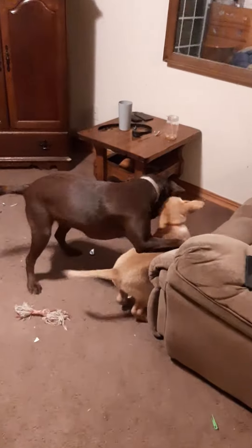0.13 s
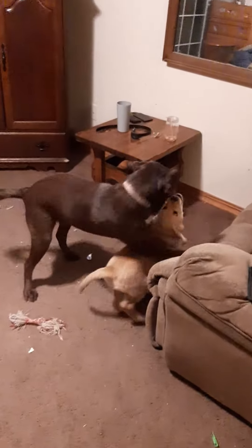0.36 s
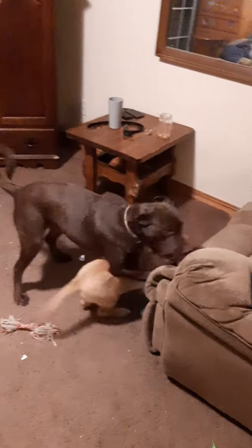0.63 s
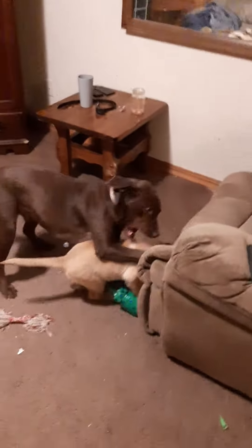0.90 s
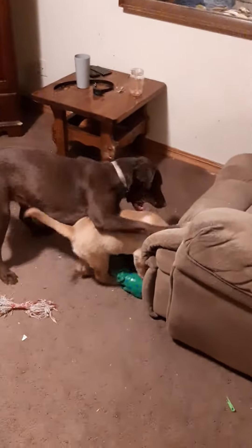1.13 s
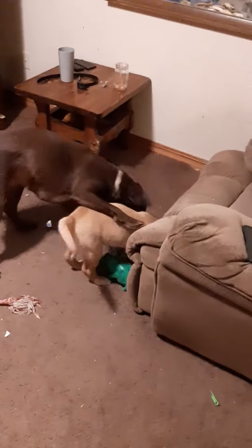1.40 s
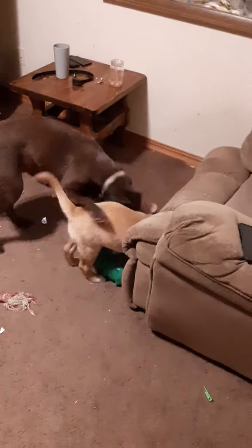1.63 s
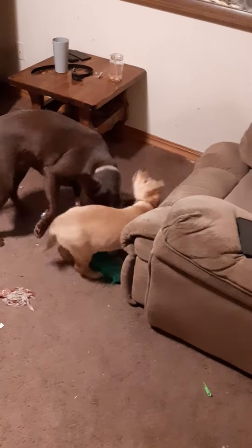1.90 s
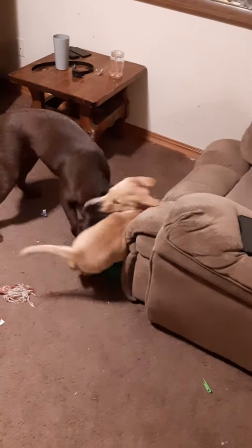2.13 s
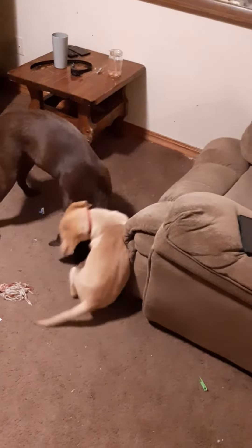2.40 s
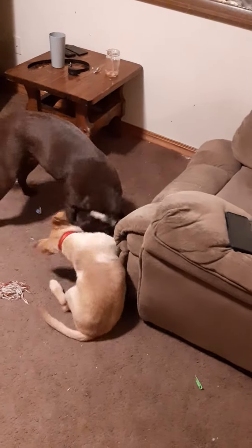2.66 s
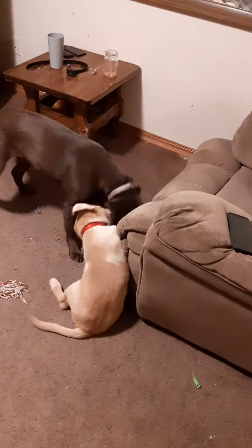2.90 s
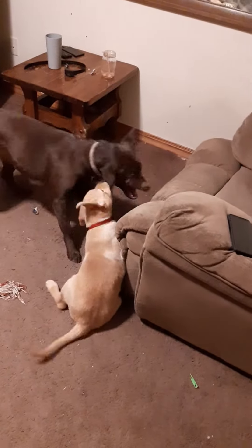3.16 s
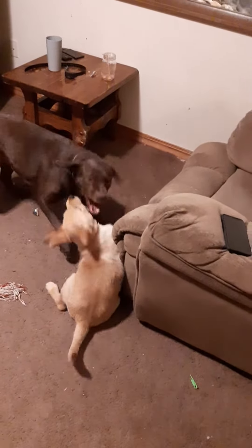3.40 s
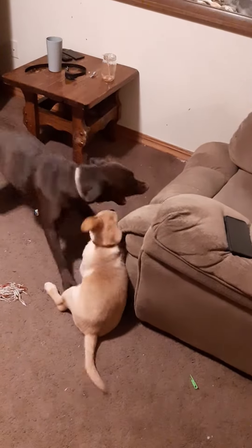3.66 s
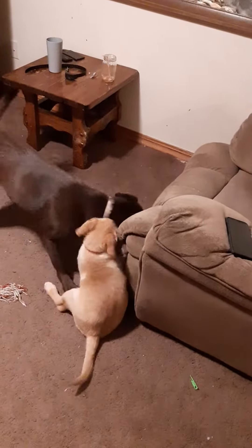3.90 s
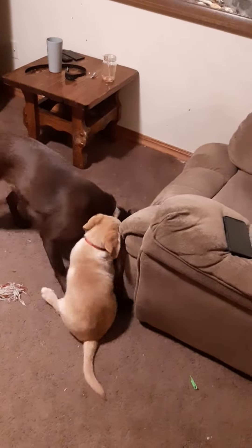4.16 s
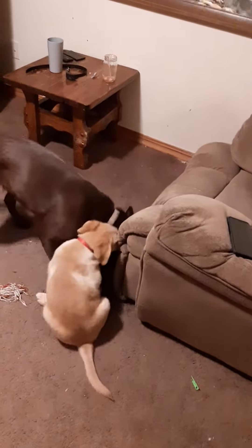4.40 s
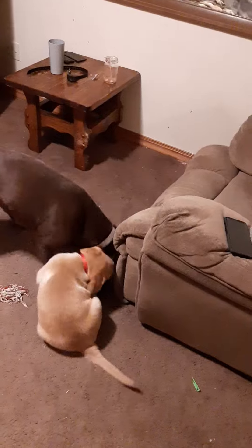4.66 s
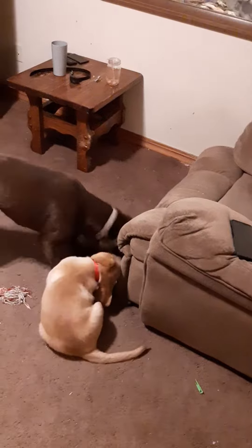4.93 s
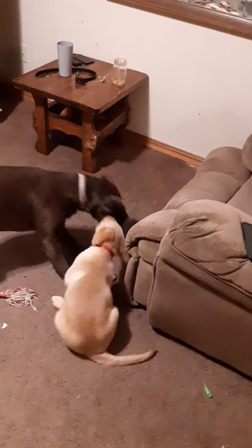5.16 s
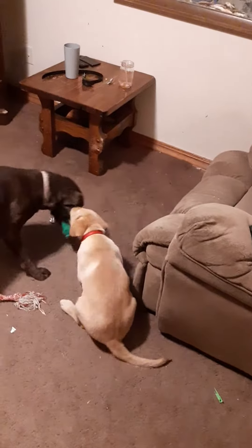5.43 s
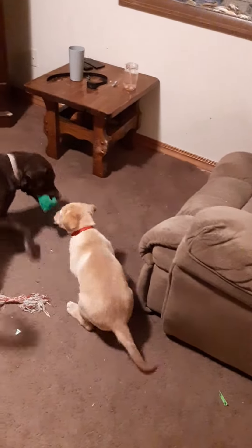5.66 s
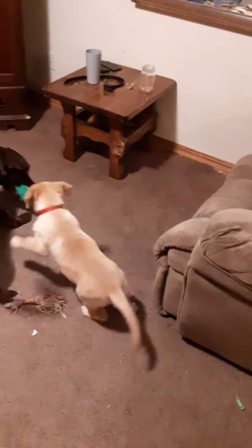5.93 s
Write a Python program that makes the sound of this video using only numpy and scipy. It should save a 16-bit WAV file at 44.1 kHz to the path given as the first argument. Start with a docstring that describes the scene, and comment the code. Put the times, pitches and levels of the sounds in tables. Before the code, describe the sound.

Low, raspy dog growls start at once and repeat in bursts under half a second long, breathy and fluttering, shifting from closed-mouthed to open and snarly. Hissing fur and breath swell around them, with brief metallic tag ticks and dull soft thuds. The growling thins out midway, pauses, returns strongly with snapping, then fades after one last softer growl. Close, dry indoor sound with short echoes, soft air and slight hum.

```python
"""A small furnished room, where two dogs wrestle on the carpet a few steps from a pair of microphones.
They growl in short hoarse bursts: uneven pulses and breath noise ring chest, throat and mouth, and hard snaps
ring the mouth. Shaped noise makes the hiss of fur and breath; ringing modes and a scrape make short bright
rattles, most of them collar tags; sinking sines make low soft thumps, some perhaps paws or bodies on the carpet.
Soft noise and a faint mains hum fill the air; random taps make the echoes."""
import sys
import numpy as np
from scipy import signal
from scipy.fft import rfft, irfft
from scipy.io import wavfile
from scipy.ndimage import uniform_filter1d

SR = 44100
rng = np.random.default_rng(int(sys.argv[2]) if len(sys.argv) > 2 else 0)


def amplitude_ratio(level_db):
    """Convert a level in decibels to the matching linear amplitude (field) ratio."""
    exponent = np.asarray(level_db, float) / 20
    return 10 ** exponent


def wav_out(sig):
    """Save sig, one row per channel (or a flat mono array), as 16-bit PCM at SR to the path in sys.argv[1]."""
    wavfile.write(sys.argv[1], SR, np.round(np.clip(np.atleast_2d(sig).T, -1, 1) * 32767).astype(np.int16))


N = 266805

# how alike diffuse sound is at both microphones: (frequency [Hz], left-right likeness [0-1])
LIKENESS = [(130, .99), (250, .88), (500, .3), (2000, .2), (12000, .2)]


def evened(x):
    """Scales to rms 1."""
    return x / np.sqrt(np.mean(x ** 2) + 1e-20)


def read(points, hz):
    """Reads a spectrum on a log-frequency axis."""
    f, value = np.transpose(points)
    return np.interp(np.log(hz + 1), np.log(f + 1), value)


def add(mix, s, sound):
    """Mixes a sound in at s seconds."""
    part = mix[..., round(s * SR):][..., :sound.shape[-1]]
    part += sound[..., :part.shape[-1]]


def steady(x):
    """Divides out the slow level, so that a curve sets the loudness."""
    return x / np.sqrt(uniform_filter1d(x ** 2, 4000) + 1e-20)


def resonate(x, hz, width):
    """Shifts the curve hz down to zero, smooths twice, and shifts back: a steep moving resonance."""
    turn = np.exp(2j * np.pi * np.cumsum(hz * np.ones(len(x))) / SR)
    r = np.exp(-np.pi * width / SR)
    smooth = signal.lfilter([(1 - r) ** 2], [1, -2 * r, r * r], x / turn)
    return 2 * (turn * smooth).real


def alike(first, second, hz):
    """Blends two independent spectra into a left-right pair as alike as the table says."""
    same = np.clip(read(LIKENESS, hz), -1, 1)[:, None]
    return np.array([first, same * first + np.sqrt(1 - same ** 2) * second])


def noise(field_db):
    """Two partly alike channels of noise shaped by a dB field of (Hz, s), with small random patches."""
    frames, hz = N // 128 + 5, np.fft.rfftfreq(512, 1 / SR)
    a, b, c, d, patches = rng.standard_normal((frames, 257, 5)).T
    patches = evened(uniform_filter1d(uniform_filter1d(patches, 8, 0), 14, 1))
    z = alike(a + 1j * b, c + 1j * d, hz)
    z *= amplitude_ratio(field_db(hz[:, None], np.arange(frames) * 128 / SR) + 2.2 * patches)
    return signal.istft(z, nperseg=512, noverlap=384)[1][:, :N]


def placed(x, lead_ms, left_db):
    """A source off centre reaches the left microphone first; its long bass waves are alike at both."""
    late = np.interp(np.arange(len(x)) - lead_ms * SR / 1000, np.arange(len(x)), x)
    left, right = x * amplitude_ratio(left_db / 2), late * amplitude_ratio(-left_db / 2)
    side = signal.lfilter(*signal.butter(2, 200, "high", fs=SR), left - right)
    return (left + right + np.array([side, -side])) / 2


def growl(rows, voice, mouth, unsteady, flutter_db, throat_db, nose_db, muzzle_db, teeth_db):
    """Uneven fold pulses and puffs of breath, shaken by loose tissue, ring chest, throat and mouth."""
    breath, flutter_hz = 0.2, 31.92
    s, *columns = np.transpose(rows)
    t = np.arange(s[0], s[-1], 1 / SR)
    level_db, open_db = (np.interp(t, s, c) for c in columns)
    fold_hz, throat_hz = np.linspace(*voice[:2], len(t)), voice[2]
    rasp_hz, rasp_width, rasp_db = voice[3:]
    mouth_hz = np.interp(t, np.linspace(s[0], s[-1], 3), mouth[:3])

    wander, sway, hiss = rng.standard_normal((len(t), 3)).T
    timing = np.exp(unsteady * evened(uniform_filter1d(wander, 300)))
    turns = np.cumsum(fold_hz * timing) / SR
    flutter_sway = 1 + 0.3 * evened(uniform_filter1d(sway, 1500))
    shake = np.cos(2 * np.pi * np.cumsum(flutter_hz * flutter_sway) / SR)
    # every closure of the folds draws its own size
    size = amplitude_ratio((1 + 8 * unsteady) * rng.standard_normal(400))[turns.astype(int)]
    closing = np.diff(np.floor(turns), prepend=0) * size
    puffs = (0.3 + np.exp(-(turns % 1) / 0.3)) * size * hiss
    drive = (1 - breath) * evened(closing) + breath * evened(puffs)
    drive *= amplitude_ratio(flutter_db * shake)

    def ring(hz, width, db=0):
        """One resonance of the voice at a set level."""
        return amplitude_ratio(db) * evened(resonate(drive, hz, width))

    def stray():
        """A slow random drift."""
        return evened(uniform_filter1d(uniform_filter1d(rng.standard_normal(len(t)), 1200), 1200))

    def roam(hz, width, db):
        """Lips and tongue never rest: the resonance strays in pitch (share) and level (dB)."""
        return ring(hz * (1 + 0.035 * stray()), width, db + 3 * stray())

    low = ring(180, 170)  # chest
    low -= ring(throat_hz, 220, throat_db)
    low += ring(765, 190, nose_db)  # between throat and mouth
    low = signal.sosfilt(signal.butter(4, 72, "high", fs=SR, output="sos"), low)

    bared_db = 0.08 * np.clip(open_db, -20, 10)  # an open mouth bares teeth and rasp
    high = ring(mouth_hz, mouth[3])
    high -= roam(1530, 440, muzzle_db)
    high += roam(2070, 320, teeth_db + bared_db)
    high -= roam(rasp_hz, rasp_width, rasp_db + bared_db)
    high += roam(1.28 * rasp_hz, rasp_width, rasp_db - 4 + bared_db)  # the rasp's higher twin
    onset = np.minimum((t - s[0]) / 0.00068, 1)
    return amplitude_ratio(level_db) * (steady(low) + amplitude_ratio(open_db) * steady(high)) * onset


def gusts(t, top):
    """Level in dB of all gusts, or of their top octave: most swell to a peak and fade; the first only fades."""
    # gusts of panting and rubbing fur: (time where swell turns to fade [s], relative level there [dB],
    # swell [dB/s], fade [dB/s], top octave against the rest [dB]); a negative swell falls
    gust_rows = [(.3, -52, -18, 17.5, -11), (0.886, -43.5, 105, 178.5, -12), (1.22, -60, 42, 89, -8.5),
                 (1.629, -42, 94, 73, -9.5), (2.075, -38, 192, 126, -11.5), (2.632, -57.5, 23, 15, -9),
                 (3.0, -55, 195, 59, -17), (3.534, -48.5, 274, 48, -8), (4.581, -52, 190, 20, -14),
                 (5.453, -48, 81, 11.5, -12)]
    let_go_s, let_go_db_per_s = 0.22, 54.5  # this long after its turn a gust fades faster
    top_follows = 0.81  # share of each swell and fade that the top octave follows
    s, db, swell, fade, top_db = np.transpose(gust_rows)[:, :, None]
    under_db = swell * np.maximum(s - t, 0) + fade * np.maximum(t - s, 0)
    under_db += let_go_db_per_s * np.maximum(t - s - let_go_s, 0)
    each_db = db + top_db - top_follows * under_db if top else db - under_db
    return 10 * np.log10((amplitude_ratio(each_db) ** 2).sum(0))


def rustle():
    """Breath and rubbing fur, left of centre: a grainy hiss whose top octave swells less than the rest."""
    # colour of the hiss below the top octave: (frequency [Hz], relative level per Hz [dB])
    hiss_colour = [(1500, 4), (2400, -0.5), (3000, -4.5), (4800, -4.5), (8200, -11)]

    def field(hz, t):
        """Level over frequency and time."""
        return np.where(hz > 9000, gusts(t, top=True) - 5, gusts(t, top=False) + read(hiss_colour, hz))

    grain, clumps = (evened(uniform_filter1d(rng.standard_normal(N), size=n)) for n in (200, 900))
    left, right = amplitude_ratio(1.46 * grain + 1.2 * clumps - 10) * noise(field)
    return np.array([left, np.roll(right, shift=19)])  # right comes later, in samples


def air():
    """Quiet room noise and a wavering mains hum."""
    # colour of the room noise: (frequency [Hz], relative level per Hz [dB])
    air_colour = [(30, -28), (55, 6), (90, 4), (200, 1), (550, -3), (1500, -10), (3000, -23.5), (7500, -30),
                  (10000, -39), (15700, -26)]
    # partials of the hum: (frequency [Hz], rms level before the waver [dB])
    hum_partials = [(119.5, -58.5), (240, -68)]
    t = np.arange(N) / SR
    waver_db = 1.8 * evened(uniform_filter1d(rng.standard_normal(N), 4000))
    hum = sum(np.sqrt(2) * amplitude_ratio(db + waver_db) * np.sin(2 * np.pi * hz * t) for hz, db in hum_partials)
    hush = evened(noise(lambda hz, t: read(air_colour, hz) + 0 * t))
    return amplitude_ratio(-54.5) * hush + hum


def tail():
    """Sparse taps of random sign, each band dying at its own speed; the bass is alike in both ears."""
    # late decay of the echoes: (frequency [Hz], time to fall 60 dB [s])
    decay = [(120, 0.46), (400, 0.18), (1200, 0.32), (4000, 0.12), (12000, 0.0044)]
    taps = np.zeros((2, SR // 2))
    at = np.arange(160, SR // 2 - 20, 20) + rng.integers(0, 20, (2, (SR // 2 - 161) // 20))
    np.put_along_axis(taps, at, rng.choice([-1., 1.], at.shape), 1)
    hz, t, z = signal.stft(taps, SR, nperseg=512)
    late = amplitude_ratio(-60 * t / read(decay, hz)[:, None])
    early = amplitude_ratio(7 - 60 * t / 0.07)  # strong first echoes off near furniture
    taps = signal.istft(alike(z[0], z[1], hz) * (late + early), SR, nperseg=512)[1]
    return taps / np.linalg.norm(taps, axis=1)[:, None]


def room(x):
    """Three random echo patterns blend slowly in turn, so no one pattern colours the whole scene."""
    shift_s = 1.3  # the blend of patterns comes round in this time, with its sign turned over
    turn = np.pi * np.arange(N) / SR / shift_s
    shares = [np.sqrt(2 / 3) * np.cos(turn + k * np.pi / 3) for k in range(3)]  # squares sum to 1
    return sum(signal.fftconvolve((x * share)[None], tail(), axes=1)[:, :N] for share in shares)


def thump(db, hz):
    """A low soft thump: a fading sine sinks from 1.514 to 0.514 times hz."""
    t = np.arange(9000) / SR
    swing = np.sin(2 * np.pi * hz * (0.514 * t + 0.023 * (1 - np.exp(-t / 0.023))))
    return amplitude_ratio(db + 1.5 - 60 * t / 0.3) * swing * np.minimum(t / 0.005, 1)


def snap(db, hz):
    """One hard closure rings the open mouth for a few cycles."""
    # every snap also wakes mouth, muzzle and teeth: (frequency [Hz], level against the main ring [dB])
    also = [(950, -7.5), (1530, -15.5), (2000, -17)]
    t = np.arange(900) / SR
    ring = np.sin(2 * np.pi * hz * t) + sum(amplitude_ratio(m) * np.sin(2 * np.pi * f * t) for f, m in also)
    return amplitude_ratio(db - 2 - 60 * t / 0.016) * ring * np.minimum(t / 0.0006, 1)


def rattle(db, centre_hz):
    """A short burst of clumped noise rings the modes nearest its pitch over a wide scrape."""
    # ringing modes, before a little luck: (frequency [Hz], relative level [dB], time to fall 60 dB [s])
    modes = [(3740, 14.5, 0.053), (4820, 13.5, 0.03), (5540, 4, 0.02), (7380, -5.5, 0.032),
             (9510, 10.5, 0.075), (13650, -18, 0.05), (15660, 2, 0.038)]
    t = np.arange(5000) / SR
    grain, luck = rng.standard_normal((2, len(t))), rng.standard_normal((len(modes), 2))
    knocks = grain[0] * amplitude_ratio(5 * uniform_filter1d(grain[1], 90) * np.sqrt(90))  # they come in clumps
    knocks *= amplitude_ratio(-60 * t / 0.09) * np.minimum(t / 0.0025, 1)
    ring = np.zeros(len(t))
    for (hz, mode_db, t60), (level_luck, pitch_luck) in zip(modes, luck):
        near_db = -16 * np.log2(hz / centre_hz) ** 2
        fading = amplitude_ratio(mode_db + 3 * level_luck + near_db - 60 * t / t60)
        ring += fading * np.sin(2 * np.pi * hz * (1 + 0.012 * pitch_luck) * t)
    scrape = resonate(knocks, centre_hz, 7200)
    out = evened(signal.fftconvolve(knocks, ring)[:len(t)]) + amplitude_ratio(3) * evened(scrape)
    return amplitude_ratio(db + 8) * out / abs(out).max()


def scene():
    """Growls, snaps, rattles and thumps, direct and through the room, with the rustle and the air."""
    # one list a growl: (time [s], level of the low voice [dB], mouth opening: high voice against low [dB])
    growl_curves = [
        [(0.0, -29.5, -6), (0.04, -43.5, 13), (0.07, -39.5, 1.5), (0.15, -42, 7), (0.304, -46.5, 7),
         (0.349, -75, -1)],
        [(0.629, -55.5, 0.5), (0.673, -41, 5), (0.713, -37.5, 2), (0.808, -32, 0.5), (0.873, -34, -2),
         (0.923, -41, 4), (0.998, -77, -20)],
        [(1.332, -58, -1), (1.362, -41, -8.5), (1.397, -35.5, -15), (1.427, -36, -2.5), (1.621, -32, 9.5),
         (1.681, -32, 4.5), (1.791, -87, 15)],
        [(1.921, -53, -33), (1.946, -42, -17), (1.971, -35.5, -3.5), (2.025, -33.5, -7), (2.13, -37, 7.5),
         (2.25, -49, -16)],
        [(2.41, -38, -13), (2.439, -47, 6.5), (2.464, -38, 5.5), (2.549, -40.5, 1.5), (2.584, -41.5, 0),
         (2.624, -41, -3.5), (2.709, -36, 2), (2.809, -53, -17)],
        [(2.861, -33, -9.5), (2.92, -37.5, -15.5), (2.958, -42.5, -11), (3.003, -36, -7), (3.093, -39.5, -8),
         (3.193, -47.5, -3.5), (3.268, -69, 3)],
        [(3.502, -55, -23), (3.572, -42, 5.5), (3.677, -48, -49), (3.712, -49.5, 2.5), (3.756, -49.5, -14),
         (3.831, -79.5, 26.5)],
        [(4.44, -59, -17), (4.48, -41.5, -13), (4.555, -33, 2.5), (4.639, -36, -12), (4.684, -33.5, -18.5),
         (4.749, -34.5, -15), (4.794, -32, -14), (4.879, -67, -20)],
        [(5.188, -58, -7), (5.235, -48.5, -6.5), (5.293, -39, -3.5), (5.348, -40, 1), (5.483, -41, 3),
         (5.582, -41, -1.5), (5.722, -80, 2)],
    ]
    # one row a growl: (first and last fold pitch [Hz], throat [Hz], rasp [Hz], rasp smoothing width [Hz],
    # rasp before its stray and baring [dB])
    voices = [(180.4, 150, 260, 2900, 350, -13.5), (130.7, 150, 370, 2800, 1400, -17),
              (111.66, 170, 383, 2890, 510, -21), (145.8, 130, 450, 3400, 1050, -12),
              (90, 110, 340, 2800, 330, -26), (132.2, 110, 352, 2760, 900, -18.5),
              (126.2, 110, 410, 3050, 690, -23), (127.6, 125, 372, 2940, 350, -19),
              (90, 100, 462, 2800, 1700, -6)]
    # the jaw moves: (mouth first, half-way, last [Hz], smoothing width [Hz], lead at the left [ms])
    mouths = [(900, 890, 1050, 310, 0.14), (1020, 1000, 1340, 370, 0.19), (1260, 1070, 1430, 590, 0.46),
              (620, 924, 1530, 200, 0.12), (900, 930, 1050, 860, 0.13), (695, 1070, 700, 420, 0.31),
              (790, 1300, 1460, 800, 0.34), (850, 1420, 1430, 780, 0.13), (900, 1010, 760, 360, 0.17)]
    # one row a growl: (unsteady timing [0-1], flutter [dB], throat [dB], nose [dB], muzzle [dB], teeth [dB]);
    # muzzle and teeth before they stray
    manners = [(.13, 1, -7, -15, -23.5, -7), (0.2, 2, -10, -10, -5, -12), (.4, 1.5, -8, -9, -4.5, -13.5),
               (0.08, 0, -4.5, -8, -6, -11), (.07, 5, -3, -20, -1.5, -8), (0.4, 0, 1.5, -7, -18.5, -13.5),
               (.25, 3.5, -6, -9, -7, -15), (.2, 5.5, 2, -13, -2, -10), (.25, 3, -15, -9.5, -6, -5.5)]
    # hard snaps of the folds inside the growls: (time [s], relative level [dB], main ring [Hz])
    snaps = [(0.038, -32.5, 900), (0.145, -16, 900), (1.42, -17.5, 1310), (2.426, -26, 1230),
             (2.451, -19.5, 1480), (2.574, -10.5, 1404), (2.665, -14, 1320), (2.863, -22, 790),
             (4.452, -36, 900), (4.481, -20, 884), (4.522, -17, 870), (4.551, -17.5, 1020),
             (4.576, -19, 1420), (4.647, -24.5, 1640), (4.685, -19.5, 1530), (4.768, -25, 1470),
             (5.194, -35.5, 2200), (5.241, -31.5, 980), (0.649, -35, 1080), (2.72, -23, 2190),
             (2.989, -30, 2720)]
    # short bright rattles, most of them collar tags; the first two are broad dry rustles:
    # (time [s], relative level [dB], centre [Hz])
    rattles = [(0.359, -31, 6800), (.48, -50, 7300), (0.588, -50.5, 13900), (1.869, -41, 10300),
               (2.312, -34.5, 12700), (2.323, -42.5, 4340), (2.694, -39, 13800), (2.717, -40, 7540),
               (2.767, -37, 10200), (2.965, -54, 12800), (3.478, -49, 5770), (3.509, -47.5, 5300),
               (3.993, -54.5, 6540)]
    # low soft thumps, some perhaps paws or bodies on the carpet:
    # (time [s], relative level [dB], pitch that the sinking scales [Hz])
    thumps = [(0.021, -43, 90), (0.546, -39.5, 80), (2.257, -37, 102), (2.287, -36, 50), (3.754, -47.5, 90),
              (4.495, -38.5, 103), (5.882, -42.5, 52.7)]
    near = np.zeros((2, N))
    for rows, voice, mouth, manner in zip(growl_curves, voices, mouths, manners):
        add(near, rows[0][0], placed(growl(rows, voice, mouth, *manner), mouth[4], -1.5))
    for s, *blow in snaps:
        add(near, s, placed(snap(*blow), 0.21, -1.3))
    for s, *burst in rattles:
        add(near, s, placed(rattle(*burst), 0.41, -0.71))
    for s, *blow in thumps:
        add(near, s, thump(*blow))
    return near + amplitude_ratio(0.2) * room(near[0]) + rustle() + air()


def low_pass(x):
    """Removes everything above the highest recorded frequency."""
    return signal.sosfilt(signal.butter(12, 16020, fs=SR, output="sos"), x)


def record(dry):
    """Little deep bass is left, the sound is thin from 8 to 10 kHz, and nothing stays above 15850 Hz."""
    # the thinning around 8 to 10 kHz: (frequency [Hz], level [dB])
    thinning = [(7900, -2), (8300, -22.5), (9000, -19.5), (9500, -11.5), (9900, -2.5)]
    hz = np.fft.rfftfreq(N, 1 / SR)
    low_cut = 1 / np.sqrt(1 + (42 / (hz + 1)) ** 6)
    colour = amplitude_ratio(read(thinning, hz)) * low_cut * (hz < 15850)
    return low_pass(irfft(rfft(dry) * colour, N))


dry = scene()
out = record(dry)
wav_out(out)
```